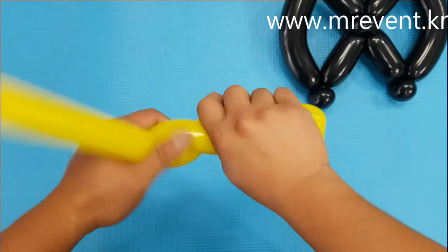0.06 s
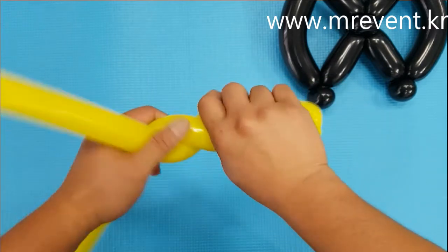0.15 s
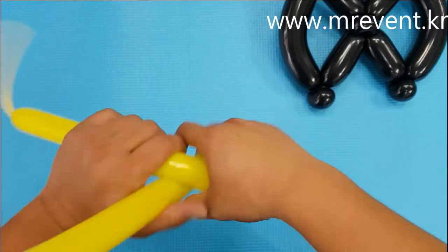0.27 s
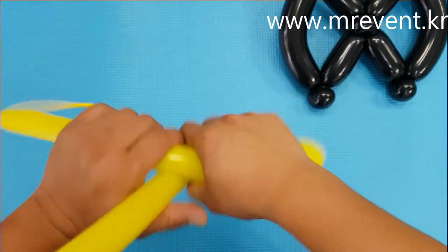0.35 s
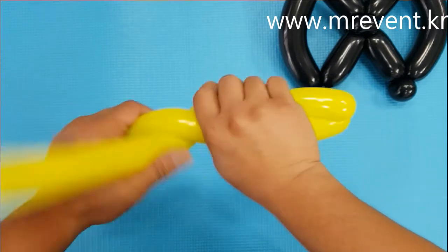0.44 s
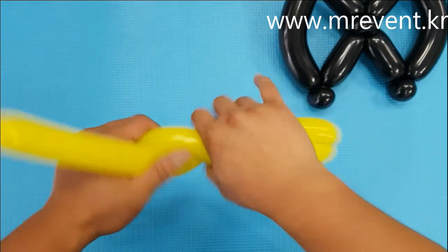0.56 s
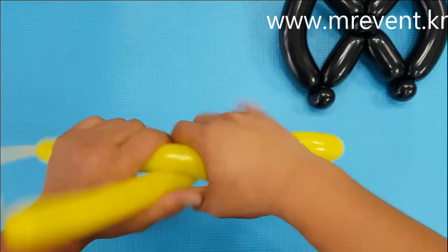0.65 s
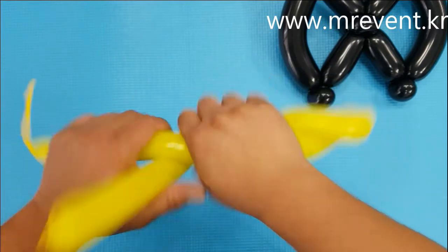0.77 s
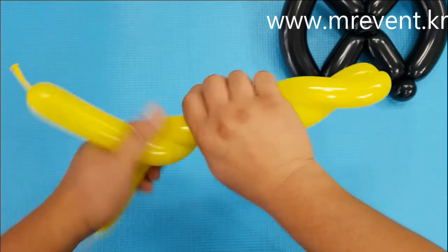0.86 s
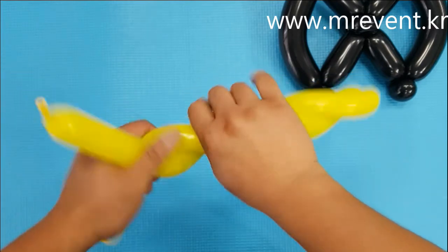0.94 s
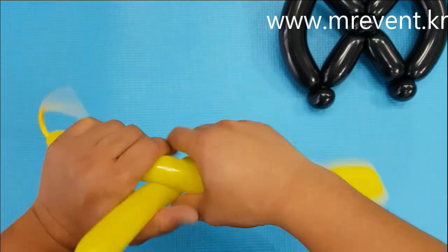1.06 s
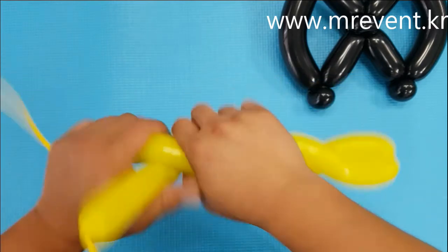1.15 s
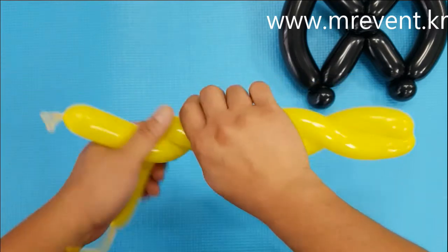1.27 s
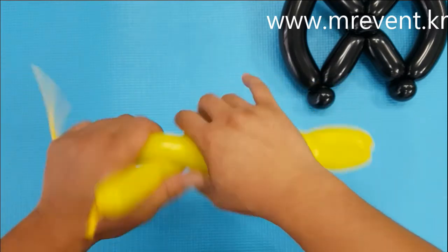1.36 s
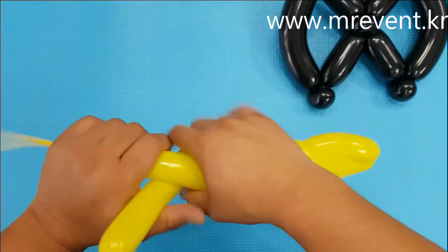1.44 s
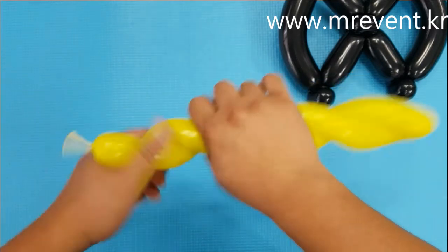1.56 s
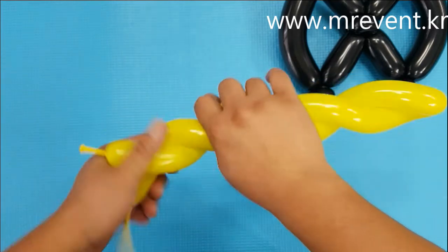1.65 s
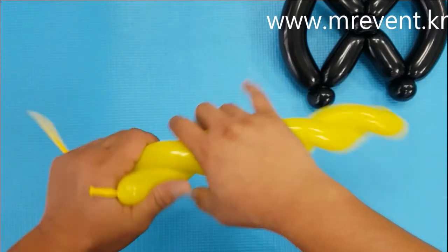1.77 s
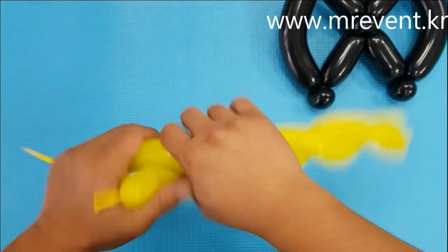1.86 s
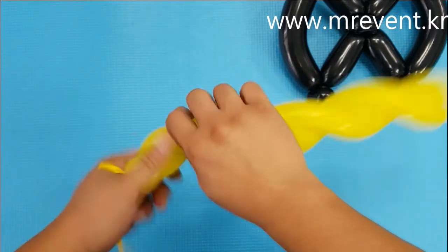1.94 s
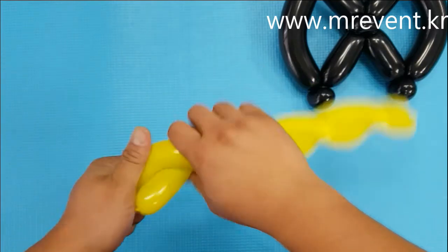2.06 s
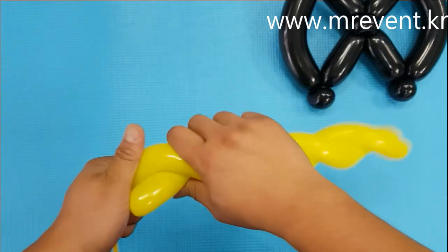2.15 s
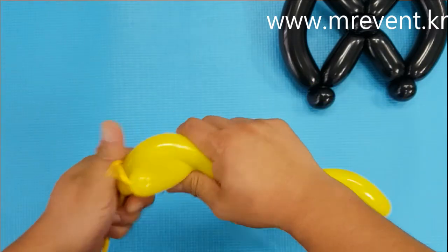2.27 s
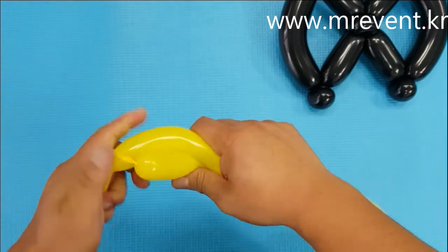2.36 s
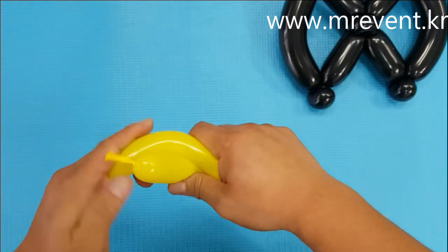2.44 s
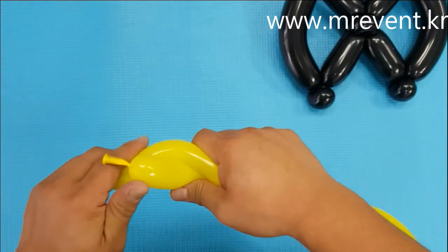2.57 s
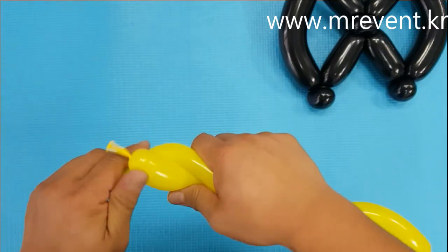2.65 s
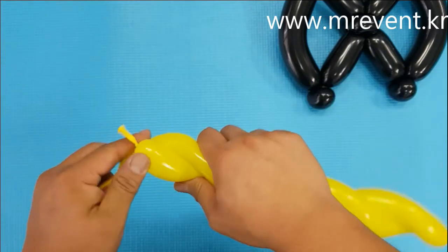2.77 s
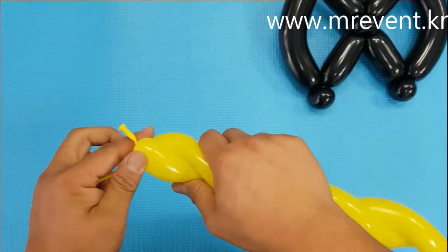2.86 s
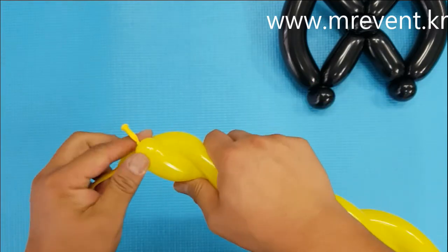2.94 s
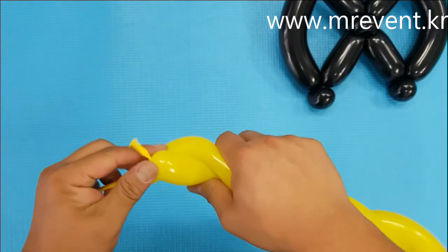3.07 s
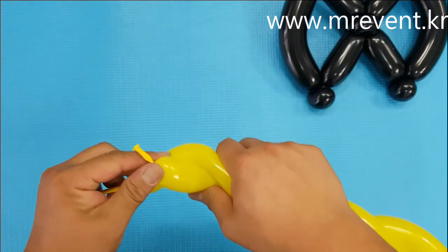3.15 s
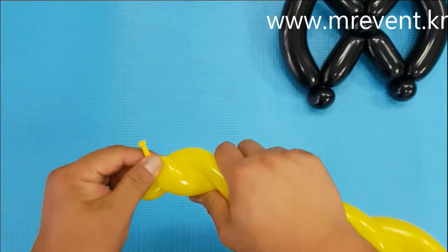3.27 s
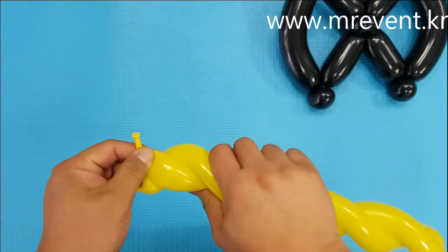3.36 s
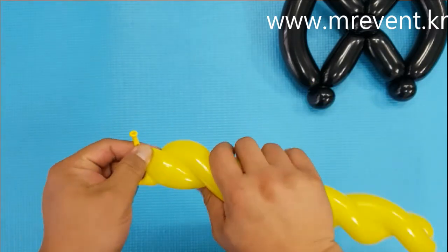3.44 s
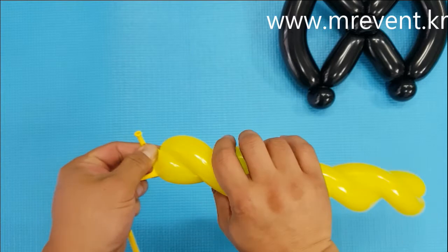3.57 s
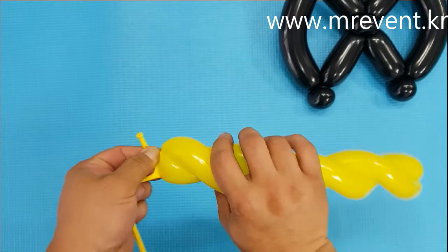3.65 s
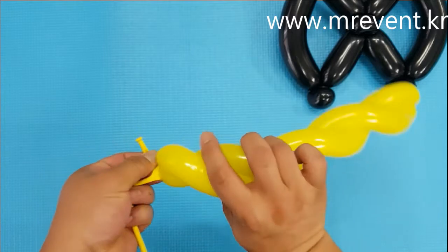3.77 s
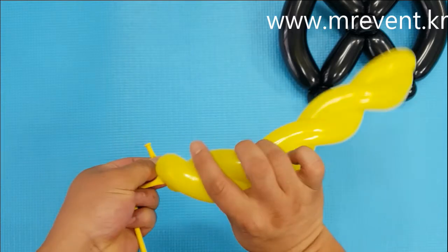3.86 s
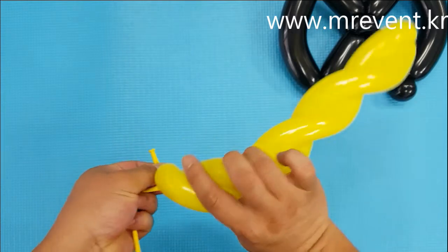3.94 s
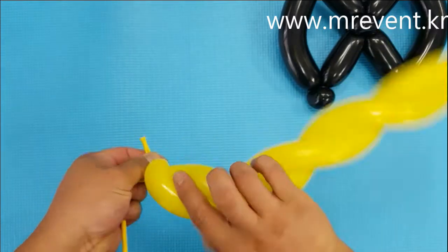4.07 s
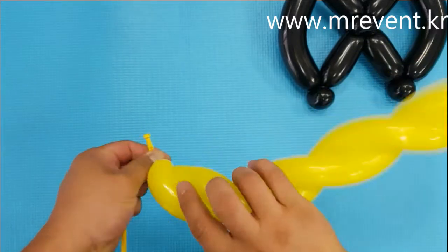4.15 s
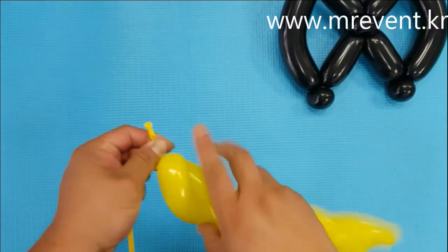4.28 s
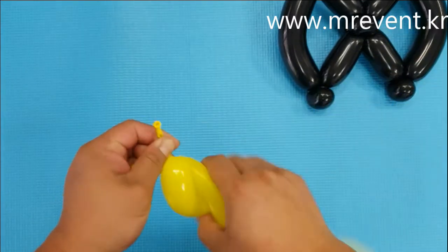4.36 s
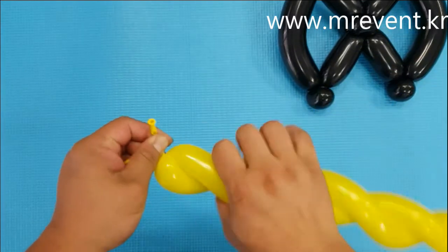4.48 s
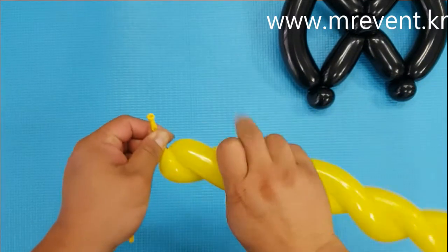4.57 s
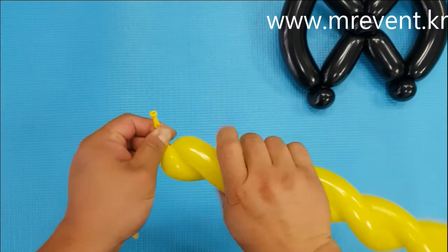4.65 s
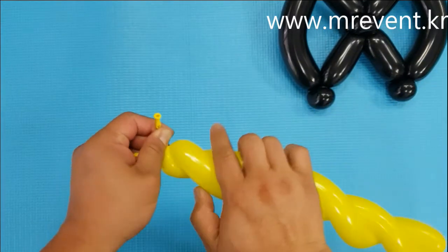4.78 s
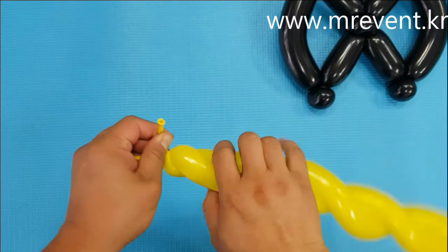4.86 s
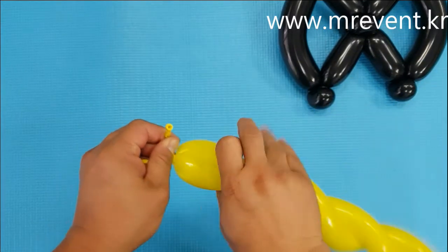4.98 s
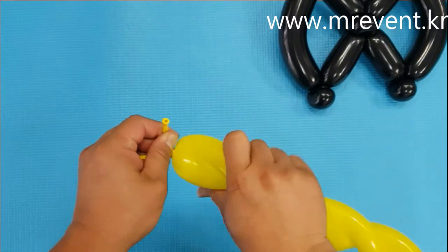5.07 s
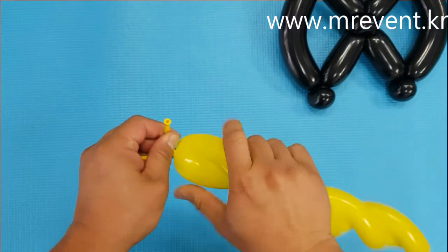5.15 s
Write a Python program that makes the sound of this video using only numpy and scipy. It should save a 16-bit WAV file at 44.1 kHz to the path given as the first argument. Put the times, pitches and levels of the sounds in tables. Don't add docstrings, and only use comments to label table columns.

```python
import sys
import numpy as np
from scipy import signal
from scipy.fft import rfft, irfft, next_fast_len
from scipy.io import wavfile

SR = 44100
rng = np.random.default_rng(int(sys.argv[2]) if len(sys.argv) > 2 else 0)


def wav_out(sig):
    wavfile.write(sys.argv[1], SR, np.round(np.clip(np.atleast_2d(sig).T, -1, 1) * 32767).astype(np.int16))


def linear_from_db(decibels):
    return 10 ** (np.asarray(decibels, float) / 20)


N = 230025

# frequency in Hz, level in dB per Hz.
ROOM_SPECTRUM = [(12, -43), (20, 10.5), (69, 10), (117, 11), (200, 10), (551, -11), (863, 11),
                 (1180, -67.5), (1650, -35), (2660, -3.5), (9150, -34), (15200, 0), (16500, -14)]
# frequency in Hz, left-right correlation from -1 to 1.
MIC_LIKENESS = [(60, 0.93), (250, 0.96), (600, 0.94), (1000, 0.86), (2000, 0.49), (4000, -0.37),
                (8000, -0.082), (14000, -0.43)]
# frequency in Hz, left minus right in dB.
LEFT_RIGHT_TILT = [(2000, 0), (4400, -1), (9000, 2)]
# frequency in Hz, level in dB per Hz.
RUBBER_SPECTRUM = [(88, -47), (150, -11), (518, -4.5), (606, -38), (830, 4), (1160, -17), (1360, -4),
                   (2550, -6.5), (6050, -17), (9890, -19.5), (14700, -21.5), (15600, 15), (16500, -43)]
# frequency in Hz, width in Hz, level in dB.
TUBE_MODES = [(370, 20, -15.5), (850, 450, 11), (1078, 41, -0.5), (1228, 79, 0), (1650, 91, 1),
              (3420, 860, -20)]
# frequency in Hz, gain in dB.
OVERTONE_GAIN = [(700, -9), (1050, -0.5), (1400, 3.5), (1800, -5), (2400, -2.5), (3600, -4.5), (4800, -12),
                 (7500, -5.5)]
# time in seconds, level in dB.
PALMS = [
    (0, -46.5),
    (1.1, -47.5),
    (1.9, -67),
    (2.2, -56.5),
    (3.6, -54.5),
    (4.2, -42.5),
    (5.21, -49.5),
]
# start in seconds, peak in dB, pitch in Hz, decay time T60 in seconds.
AIR_KNOCKS = [(0.411, -29, 210, 0.12), (0.63, -23, 235, 0.22), (1.01, -22, 208, 0.13),
              (1.078, -28, 363, 0.096), (1.748, -28.5, 189, 0.16), (2.003, -27, 440, 0.12),
              (2.943, -28.5, 305, 0.069), (4.029, -21, 469, 0.086), (4.151, -25, 433, 0.06),
              (4.128, -28, 400, .05), (4.11, -29, 200, .14)]
# time in seconds, pressure in dB, bright rasp re body in dB.
GRIP_DRAG = [
    (0, -20, -5),
    (.3, -38, -2),
    (1.1, -37, -5),
    (1.9, -40, -3.5),
    (2.15, -33.5, -4),
    (2.7, -36.5, -4),
    (3.2, -45, -11),
    (3.6, -35, -12),
    (4.2, -41, -6.5),
    (5.21, -37, -7),
]
# start in seconds, length in seconds, body in dB,
# bright rasp re body in dB, skin resonance in Hz.
SWELLING_RUBS = [(0.022, 0.097, -18, -2, 1287), (0.107, 0.046, -14, -3.5, 1360),
                 (0.165, 0.067, -23.5, -0.5, 880), (0.382, 0.012, -30, -15, 1500),
                 (0.506, 0.027, -22, 0, 1100), (0.579, 0.018, -24.5, -4, 1710),
                 (1.135, 0.05, -28, -2, 1650), (1.714, 0.045, -29.5, 0.5, 1107),
                 (1.972, 0.041, -16, -4, 1910), (2.734, 0.056, -33, -3.5, 900),
                 (2.85, 0.076, -42.5, 8.5, 3060), (3.347, 0.079, -33, -6, 1010),
                 (3.746, 0.088, -33, -10, 944), (4.121, 0.035, -31, -9, 1390),
                 (4.489, 0.067, -33.5, -7, 1540), (4.622, 0.069, -25.5, -11, 1430),
                 (4.851, 0.057, -32.5, 0.5, 1610), (5.059, 0.055, -35, -14, 1650)]
# start in seconds, length in seconds, body in dB,
# bright rasp re body in dB, skin resonance in Hz.
HELD_RUBS = [(0.737, 0.05, -27, -11, 1310), (0.794, 0.0091, -22, 2.5, 990), (0.824, 0.066, -36, 9.5, 1200),
             (1.245, 0.04, -17, 3.5, 3100), (1.933, 0.042, -17.5, -0.5, 2880), (2.338, .02, -27, 4, 4200),
             (2.31, 0.069, -24.5, 3.5, 2910), (1.336, 0.018, -17.5, -7, 1635), (1.553, 0.056, -31, 9, 1220),
             (1.655, 0.015, -30.5, 5.5, 760), (2.157, 0.016, -25, 2, 3000), (2.226, 0.05, -27, 5, 3300),
             (1.848, .025, -39, -4, 1500), (2.289, 0.021, -18, 0, 1060), (2.49, 0.025, -37, -11, 1600),
             (2.947, 0.019, -41, 5, 2060), (3.27, 0.09, -41, -10, 930), (3.47, 0.097, -35.5, -2, 1003),
             (3.864, 0.12, -27, -8, 1705), (4.087, 0.023, -19.5, -4.5, 1375),
             (3.975, 0.075, -24.5, -8, 1780), (4.427, 0.054, -35, -4.5, 1600), (4.706, 0.04, -36, 4, 1700),
             (4.95, 0.031, -28.5, 0.5, 2100), (5.143, 0.014, -30, -12.5, 850)]
# start in seconds, length in seconds, body in dB,
# bright rasp re body in dB, skin resonance in Hz.
FADING_RUBS = [(0.006, 0.0068, -23, 2, 1260), (0.309, 0.038, -27, -2, 2500), (0.398, 0.045, -27, 1, 950),
               (1.03, .08, -38, -4, 2300), (0.62, 0.029, -25, -6, 2060), (0.898, 0.095, -21, -0.5, 873),
               (1.004, 0.024, -23.5, 0, 1720), (1.188, 0.051, -19.5, 0.5, 1110),
               (1.29, 0.038, -19, -3, 1270), (1.37, 0.026, -23, -6, 1150), (2.025, 0.048, -17, -5, 1620),
               (2.09, 0.077, -38.5, 0, 885), (2.385, 0.06, -24.5, -5.5, 2100), (2.538, 0.062, -22, 1, 1920),
               (2.6, 0.036, -25, -2, 760), (3.006, 0.061, -35.5, 4, 1840), (3.141, 0.022, -37, -9, 920),
               (4.203, 0.1, -39, -6, 736), (4.284, 0.028, -45, 9.5, 2720), (4.754, 0.088, -29.5, -3, 800)]
# time in seconds, peak in dB, ring in Hz.
LONE_SNAPS = [(1.941, -9.5, 1050), (0.129, -10, 1470), (0.155, -9, 870), (4.7559, -8, 387),
              (0.236, -22, 970), (1.1952, -8, 1240), (0.414, -9.5, 980), (0.594, -19, 1730),
              (0.707, -26, 487), (4.374, -29, 700), (0.801, -11, 1040), (1.007, -10, 1570),
              (1.215, -5, 1500), (1.347, -9.5, 1720), (1.379, -15, 1130), (1.669, -18, 780),
              (1.748, -12.5, 2850), (2.2, -14.5, 3120), (2.216, -14.5, 1150), (2.783, -20.5, 810),
              (2.945, -23.5, 890), (3.515, -27, 1110), (3.773, -24, 990), (3.817, -22, 970),
              (3.972, -14, 1830), (4.087, -17.5, 1470), (4.293, -17, 2780), (1.19, -18, 1300),
              (.404, -21, 1200), (1.876, -33, 2600), (4.7565, -14, 1200), (.033, -11, 1140),
              (1.732, -27, 1150), (.204, -19, 1000), (1.342, -15, 1000), (4.458, -25.5, 835),
              (4.884, -24.5, 880), (5.116, -23.5, 1180)]
# start in seconds, length in seconds, gap in seconds, peak in dB, ring in Hz.
FOLD_CHATTER = [
    (.624, .016, .011, -16, 1970),
    (1.455, .044, .0175, -31, 1300),
    (2.547, .025, .017, -12, 1930),
    (2.605, .021, .0085, -17, 830),
    (2.856, .062, .0087, -28, 2900),
    (2.951, .011, .007, -25, 1980),
    (3.009, .032, .013, -22, 1100),
    (3.142, .011, .007, -25, 900),
    (4.686, .015, .0085, -19, 1350),
    (.165, .003, .01, -13, 850),
]
# time in seconds, peak in dB, ring in Hz.
HARD_TWIST_SLIPS = [(0.0227, -15, 3150), (0.0458, -10, 1010), (0.05, -5.5, 1410), (0.0553, -8.5, 1340),
                    (0.0622, -11, 1990), (0.0701, -8, 1410), (0.0755, -8.5, 970), (0.0835, -7, 1390),
                    (0.0914, -13, 1460), (0.1008, -6.5, 1430), (0.1084, -12, 960), (0.1418, -12, 1420),
                    (0.1491, -14, 1350), (0.8985, -14, 2790), (0.9028, -10, 1880), (0.9106, -13, 4300),
                    (0.9215, -16, 1254), (0.9397, -18, 3750), (0.9523, -12.5, 950), (0.9591, -15, 2740),
                    (0.969, -21, 960), (0.9732, -18, 2660), (0.9824, -19, 1500), (1.2477, -7, 1300),
                    (1.2557, -9.5, 3170), (1.2618, -7, 1570), (1.2661, -8.5, 1248), (1.2771, -8, 1120),
                    (1.2897, -18, 1170), (1.3006, -14, 1150), (1.3103, -18, 1220), (1.3299, -21, 1230),
                    (1.9765, -11, 850), (1.9848, -8.5, 1310), (1.9933, -9, 1480), (1.9974, -8, 950),
                    (2.0006, -11, 926), (2.0085, -10, 820), (2.0127, -9.5, 1070), (2.0166, -14, 1100),
                    (2.0343, -14, 2250), (2.0514, -15, 1650), (2.0587, -17, 1580), (2.2281, -11.5, 3190),
                    (2.2354, -14.5, 3640), (2.2433, -11.5, 1160), (2.2496, -11, 3200), (2.2562, -12, 1100),
                    (2.2666, -16, 3220), (2.2954, -15, 1070), (2.3017, -20, 1010), (2.3068, -18, 1120),
                    (2.3111, -16, 3000), (2.3186, -19, 2970), (2.3244, -17, 900), (2.3318, -15, 930),
                    (2.3359, -17, 850), (2.3457, -14, 890)]
# time in seconds, peak in dB, ring in Hz.
SOFT_RUB_SLIPS = [(3.3072, -29, 930), (3.3168, -29.5, 970), (3.3584, -31, 1090), (3.3708, -27, 980),
                  (3.4025, -30, 1100), (3.4113, -23, 1020), (3.4189, -26, 990), (3.4238, -25, 1040),
                  (3.4312, -25, 1020), (3.4479, -26, 1100), (3.4682, -27, 990), (3.4765, -32, 1010),
                  (3.4806, -33, 1100), (3.4888, -28, 1030), (3.5222, -27, 950), (3.5332, -30, 1450),
                  (3.5623, -30, 1270), (3.6305, -32, 1060), (3.6479, -30, 2670), (3.664, -25, 1110),
                  (3.6771, -25, 1150), (3.6865, -23, 1110), (3.6956, -29, 1110), (3.7137, -26.5, 1030),
                  (3.7284, -30, 1020), (3.7978, -24, 1540), (3.8653, -16, 1790), (3.8791, -15, 1780),
                  (3.8966, -16, 950), (3.916, -22, 1650), (3.925, -14, 1790), (3.9399, -18, 1840),
                  (3.9546, -17, 1770), (3.9814, -18, 1780), (3.9876, -18, 1090), (4.001, -15, 1720),
                  (4.0235, -15, 1690), (4.0332, -20, 1730), (4.0417, -18, 1460), (4.1596, -30, 810),
                  (4.2167, -29, 2890), (4.4013, -33, 1570), (4.4361, -32, 810), (4.5278, -31, 2720),
                  (4.5358, -27, 1540), (4.5494, -32, 1430), (4.5855, -26.5, 644), (4.6483, -24, 750),
                  (4.6593, -22, 1250), (4.6716, -16.5, 1390), (4.6788, -16.5, 2020), (4.7951, -22, 810),
                  (4.8606, -34, 1170), (4.8915, -23, 1720), (4.8984, -26, 2540), (4.9644, -24, 2130)]
# start in seconds, length in seconds, first and last slips per second, level in dB.
PURE_PIPS = [
    (.036, .006, 1150, 1095, -11),
    (.209, .0038, 1570, 1640, -16.5),
    (1.2, 0.0061, 1123, 1050, -9.5),
    (4.760, .0062, 422, 450, -17.5),
    (4.236, .03, 470, 546, -39.5),
    (.42, .018, 930, 880, -31),
]
# start in seconds, length in seconds, first and last slips per second, level in dB.
REEDY_SQUEAKS = [
    (1.937, 0.005, 1540, 1500, -7.5),
    (1.946, .011, 1480, 1540, -6.5),
    (1.958, .015, 845, 812, -15),
    (1.977, 0.0108, 770, 653, -20),
    (1.986, 0.018, 1310, 1450, -18),
    (1.996, .015, 930, 775, -20),
    (2.047, .022, 1800, 1615, -26),
    (2.368, .016, 885, 870, -13.5),
    (2.322, .036, 790, 890, -25),
    (.024, 0.0118, 950, 1080, -19),
]
# start in seconds, length in seconds, first and last slips per second,
# level in dB.
RICH_BUZZES = [
    (2.543, 0.0405, 323.7, 374, -28.5),
    (4.088, .023, 477, 470, -43),
    (2.157, .016, 930, 960, -25),
]
# time in seconds, slips per second, level in dB.
LONG_SQUEAL = [
    (1.554, 1340, -18),
    (1.559, 1070, -13),
    (1.568, 1210, -13.5),
    (1.585, 1230, -9),
    (1.595, 1350, -14.5),
    (1.606, 1520, -13.5),
    (1.612, 1700, -23),
]
# time in seconds, slips per second, level in dB, overtones in dB.
BENT_CHIRP = [
    (.814, 900, -40, -14),
    (.819, 955, -23, -20),
    (.826, 1030, -9, -14),
    (.831, 1110, -24, 0),
    (.836, 1155, -19, 2),
    (.849, 1216, -15.5, -4),
    (.856, 1210, -21, -9),
    (.875, 1184, -31, -10),
    (.892, 1179, -46, 2),
]
# time in seconds, slips per second, level in dB, overtones in dB.
LOW_HONK = [
    (.295, 345, -44, -25),
    (.306, 350, -28, -12),
    (.312, 352, -21, -6),
    (.335, 364, -15.5, -10),
    (.34, 362, -28, -12),
    (.365, 358, -38, -16),
]

HUM_HZ, HUM_DB, ROOM_TONE_DB = 120.8, -47, -42
ROOM_T60_S, ROOM_DB, WALL_CUT_HZ = 0.18, -15.5, 12000
RISE_S, BASS_CUT_HZ, CUTOFF_HZ = .0018, 160, 16800
SWELL_DB, HOLD_DB, FADE_DB = 9, 0.7, -12
GRIP_S = .0004
GAP_JITTER, CHATTER_SPREAD_DB, RING_JITTER = .07, 1.5, .04
LOW_RING_HZ, LOW_RING_SHARE = 950, .35
PIP_DB, SQUEAK_DB, BUZZ_DB, SQUEAL_DB = -22, -13, -1, -15
TOP_LOSS_DB, SQUEAL_TOP_LOSS_DB = 3.5, -1.5
BUILD_DB = 3.5
ONSET_S, ONSET_DB = .002, -24
RING_OUT_DB_PER_S, RING_OUT_DB = 4500, -22
SIDES = np.array([[1], [-1]])


def rms_one(x):
    return x / np.sqrt(np.mean(x ** 2) + 1e-20)


def in_time(rows):
    s, *columns = np.transpose(rows)
    return [np.interp(np.arange(N) / SR, s, c) for c in columns]


def at_hz(points, hz):
    point_hz, value = np.transpose(points)
    return np.interp(np.log(hz), np.log(np.maximum(point_hz, 1)), value)


def drift(rate):
    r = np.exp(-2 * np.pi * rate / SR)
    noise = rng.standard_normal(N + 9000)
    return rms_one(signal.lfilter([1], [1, -2 * r, r * r], noise)[9000:])


def resonance(x, hz, width):
    r = np.exp(-np.pi * width / SR)
    poles = [1, -2 * r * np.cos(2 * np.pi * hz / SR), r * r]
    return signal.lfilter(np.array([1, 0, -1]) * (1 - r * r) / 2, poles, x)


def bands(drive, spectrum, low_hz):
    edges = low_hz * 2 ** np.arange(0, np.log2(19000 / low_hz), .5)
    for k, (low, high) in enumerate(zip(edges, edges[1:])):
        band_pass = signal.butter(2, [low, high], "band", fs=SR, output="sos")
        mid, side = signal.sosfilt(band_pass, drive[k % 2])
        hz = np.sqrt(low * high)
        alike = np.clip(at_hz(MIC_LIKENESS, hz), -1, 1)
        tilt = linear_from_db(at_hz(LEFT_RIGHT_TILT, hz) / 2 * SIDES)
        stereo = np.sqrt(1 + alike) * mid + np.sqrt(1 - alike) * side * SIDES
        yield hz, linear_from_db(at_hz(spectrum, hz)) * tilt * stereo


def room_tone():
    noise = rng.standard_normal((2, 2, N))
    air = sum(band for hz, band in bands(noise, ROOM_SPECTRUM, low_hz=18.67))
    hum_gain = linear_from_db(HUM_DB + 2.5 * drift(10)) * np.sqrt(2)
    hum = hum_gain * np.sin(2 * np.pi * HUM_HZ * np.arange(N) / SR + 1.3 * drift(3.2))
    return linear_from_db(ROOM_TONE_DB - 5.5) * rms_one(air) + hum


def room(x):
    size = next_fast_len(N + SR)
    turn = np.exp(-2j * np.pi * np.arange(size // 2 + 1) / size)
    dull = np.exp(-2 * np.pi * WALL_CUT_HZ / SR)
    out = np.zeros((2, len(turn)), complex)
    for k, lag in enumerate((rng.uniform(0.0071, .035, 16) * SR).astype(int)):
        loss = linear_from_db(-60 * lag / SR / ROOM_T60_S)
        loop = loss * (1 - dull) / (1 - dull * turn) * turn ** lag
        out[k % 2] += loop / (1 - loop) * (-1) ** (k // 2)
    return irfft(out * rfft(x, size), size)[:, :N]


def knocks(rough):
    out = np.zeros(N)
    t = np.arange(round(.2 * SR)) / SR
    for s, peak_db, hz, t60 in AIR_KNOCKS:
        fall = linear_from_db(peak_db - 60 * t / t60) * (1 - np.exp(-t / 0.0024))
        out[round(s * SR):][:len(t)] += fall * np.sin(2 * np.pi * hz * t * (1 - 0.81 * t))
    return out * (1 + rough * drift(56))


def rasp(per_s, spread_db, slip_s, smooth, tube_db):
    born = rng.random(N) < per_s * linear_from_db(4.0 * drift(30)) / SR
    sizes = born * linear_from_db(spread_db * np.minimum(rng.exponential(1, N), 4))
    gate = smooth + rms_one(signal.lfilter([1], [1, -np.exp(-1 / (slip_s * SR))], sizes))
    drive = gate * rng.standard_normal((2, 2, N))
    parts = np.zeros((3, 2, N))
    for hz, band in bands(drive, RUBBER_SPECTRUM, low_hz=137.22):
        parts[int(hz > 550) + int(hz > 2300)] += band
    low, body, bright = [rms_one(p) for p in parts]
    tube = sum(linear_from_db(db) * resonance(drive[k % 2, 0], hz, width)
               for k, (hz, width, db) in enumerate(TUBE_MODES[1:]))
    body = body + linear_from_db(tube_db) * rms_one(tube)
    shrill = resonance(drive[0, 0], 3210, 870) + 0.42 * resonance(drive[1, 0], 4320, 470)
    bright = bright + linear_from_db(-10.0 + 6.57 * drift(6.8)) * rms_one(shrill)
    low_hz, low_width, low_db = TUBE_MODES[0]
    low = low + linear_from_db(low_db) * rms_one(resonance(drive[0, 0], low_hz, low_width))
    return drive[1, 0], rms_one(low), rms_one(body), rms_one(bright)


def rubs(grit, rise_s, tail_db_per_s, width_share, partner_db):
    body_db, bright_db = in_time(GRIP_DRAG)
    low_db, = in_time(PALMS)
    body, bright, sung = linear_from_db(body_db) ** 2, linear_from_db(body_db + bright_db) ** 2, np.zeros(N)
    kinds = ((SWELLING_RUBS, SWELL_DB), (HELD_RUBS, HOLD_DB), (FADING_RUBS, FADE_DB))
    for s, length, level_db, top_db, hz, change_db in [(*row, db) for table, db in kinds for row in table]:
        i = round(s * SR)
        t = np.arange(min(round((length + 0.124) * SR), N - i)) / SR
        span = slice(i, i + len(t))
        shape_db = change_db * (np.minimum(t / length, 1) - .5) - tail_db_per_s * np.maximum(t - length, 0)
        gain = linear_from_db(level_db + shape_db) * (1 - np.exp(-t / rise_s))
        body[span] += gain ** 2
        bright[span] += (gain * linear_from_db(top_db)) ** 2
        partner_hz = hz * 2.12 if hz < 1250 else hz / 2.02
        main, partner = [rms_one(resonance(grit[span], f, width_share * f)) for f in (hz, partner_hz)]
        sung[span] += gain * (main + linear_from_db(partner_db) * partner)
    return np.sqrt(body), np.sqrt(bright), linear_from_db(low_db), sung


def sticking(rows, stick_s, depth):
    marks = np.zeros(N)
    marks[[round((s - stick_s / 2) * SR) for s, *rest in rows]] = 1
    dips = np.convolve(marks, np.hanning(round(stick_s * SR)), "same")
    return 1 - depth * np.minimum(dips, 1)


def with_luck(table):
    return [(*row, *luck) for row, luck in zip(table, rng.standard_normal((len(table), 4)))]


def slip_list():
    rows = with_luck(LONE_SNAPS)
    chance = rng.standard_normal((len(FOLD_CHATTER), 8, 8))
    for (start, length, gap, peak_db, hz), run in zip(FOLD_CHATTER, chance):
        for k, (early, strong, tune, choice, *luck) in enumerate(run[:int(length / gap) + 1]):
            low = k > 0 and np.exp(-choice ** 2 / 2) > 1 - LOW_RING_SHARE ** 2
            s = start + gap * (k + GAP_JITTER * early * (k > 0))
            ring_hz = (LOW_RING_HZ if low else hz) * (1 + RING_JITTER * tune)
            rows.append((s, peak_db + CHATTER_SPREAD_DB * strong, ring_hz, *luck))
    return rows


def slips(rows, bright, cycles, crack_db, crack_t60, tube_db):
    t = np.arange(2048) / SR
    out, kicks = np.zeros((2, N + len(t))), np.zeros(N)
    for s, peak_db, hz, turn, pan, lag, hard in rows:
        i = round(s * SR)
        grain = bright[:, i:i + len(t)] / np.std(bright[:, i:i + 100])
        late = t + lag * 0.32 / SR * SIDES
        if hz < 1250:
            partner_hz, share = 1.95 * hz, .25
        else:
            partner_hz, share = LOW_RING_HZ * (1 + .06 * hard), 1100 / hz
        ring = np.sin(2 * np.pi * hz * late + turn) + share * np.sin(2 * np.pi * partner_hz * late)
        tone = ring * linear_from_db(-60 * t / (cycles / hz + 0.0051)) * (1 - np.exp(-t / GRIP_S))
        crack = linear_from_db(crack_db + 0.42 * hard + 0.66 * np.log2(hz / 1000) - 60 * t / crack_t60) * grain
        out[:, i:i + len(t)] += linear_from_db(peak_db + 2.5) * (tone * linear_from_db(pan * .4 * SIDES) + crack)
        kicks[i] = linear_from_db(peak_db) * np.sign(turn)
    tube = np.zeros(N)
    for k, (hz, width, db) in enumerate(TUBE_MODES[1:]):
        tube += (-1) ** k * linear_from_db(db) * resonance(kicks + 1e-18, hz, width) * SR / (np.pi * width)
    return out[:, :N] + linear_from_db(tube_db) * tube


def squeak_shapes():
    for table, over_db in ((PURE_PIPS, PIP_DB), (REEDY_SQUEAKS, SQUEAK_DB), (RICH_BUZZES, BUZZ_DB)):
        for s, length, from_hz, to_hz, db in table:
            end = s + length
            rows = [(s - ONSET_S, from_hz, db + ONSET_DB),
                    (s + ONSET_S, from_hz, db - BUILD_DB),
                    (end, to_hz, db),
                    (end - RING_OUT_DB / RING_OUT_DB_PER_S, to_hz, db + RING_OUT_DB)]
            yield rows, over_db, TOP_LOSS_DB
    yield LONG_SQUEAL, SQUEAL_DB, SQUEAL_TOP_LOSS_DB
    yield BENT_CHIRP, 0, 2 * TOP_LOSS_DB
    yield LOW_HONK, 0, TOP_LOSS_DB


def squeaks(wobble, shimmer_db, rough):
    out = np.zeros(N)
    tremble, shimmer, scatter = drift(150), drift(270), drift(170)
    for rows, over_db, loss_db in squeak_shapes():
        span = slice(round(rows[0][0] * SR), round(rows[-1][0] * SR))
        hz, level_db, *reedy_db = [c[span] for c in in_time(rows)]
        phase = 2 * np.pi * np.cumsum(hz * (1 + wobble * tremble[span])) / SR
        rough_phase = phase + rough * scatter[span]
        stack = linear_from_db(level_db) * np.sin(phase)
        for k in range(2, 9):
            passed_db = at_hz(OVERTONE_GAIN, k * hz) - loss_db * max(k - 3, 0)
            stack += linear_from_db(level_db + over_db + sum(reedy_db) + passed_db) * np.sin(k * rough_phase + k)
        fade = signal.windows.tukey(len(hz), .1)
        out[span] += np.sqrt(2) * stack * linear_from_db(shimmer_db * shimmer[span]) * fade
    return out


def scene():
    grit, low, body, bright = rasp(per_s=700, spread_db=2.2, slip_s=0.0012, smooth=1.3, tube_db=-4.5)
    pressed, dragged, rumble, sung = rubs(grit, RISE_S, tail_db_per_s=884, width_share=0.041, partner_db=-11.5)
    lone, hard, soft = slip_list(), with_luck(HARD_TWIST_SLIPS), with_luck(SOFT_RUB_SLIPS)
    loose = sticking(lone + hard + soft, stick_s=.008, depth=.5)
    body_rub = linear_from_db(-6.0) * pressed * (body + linear_from_db(-12.0) * low)
    bright_rub = linear_from_db(-4.5) * dragged * bright
    rub = loose * (body_rub + bright_rub) + rumble * low
    squeak = squeaks(wobble=.010, shimmer_db=1.5, rough=.1)
    tones = squeak + knocks(rough=0.54) + linear_from_db(-9.5) * loose * sung
    snaps = slips(lone, bright, cycles=11, crack_db=-10, crack_t60=.011, tube_db=-21)
    snaps = snaps + slips(hard, bright, cycles=13.6, crack_db=-10.5, crack_t60=0.013, tube_db=-20)
    snaps = snaps + slips(soft, bright, cycles=12, crack_db=-12, crack_t60=.008, tube_db=-22)
    balloon = rub + snaps + np.stack([tones, np.roll(tones, 1)])
    balloon = signal.sosfilt(signal.butter(2, BASS_CUT_HZ, "high", fs=SR, output="sos"), balloon)
    return balloon + linear_from_db(ROOM_DB) * room(balloon.mean(axis=0)) + room_tone()


def band_limit(x):
    return signal.sosfilt(signal.butter(12, 16800, fs=SR, output="sos"), x)


def record(dry):
    overloaded = np.clip(dry, -.95, .95)
    top_cut = signal.cheby2(12, 60, CUTOFF_HZ, fs=SR, output="sos")
    return band_limit(signal.sosfilt(top_cut, overloaded))


dry = scene()
out = record(dry)
wav_out(out)
```